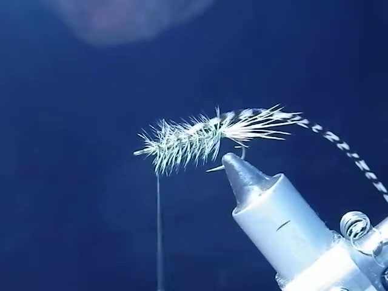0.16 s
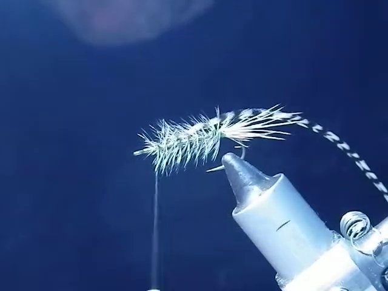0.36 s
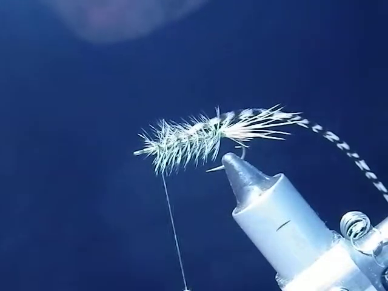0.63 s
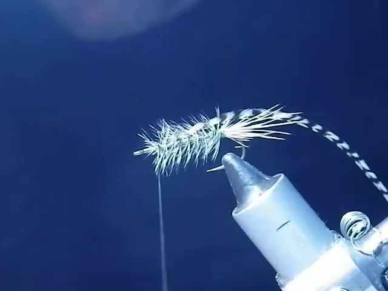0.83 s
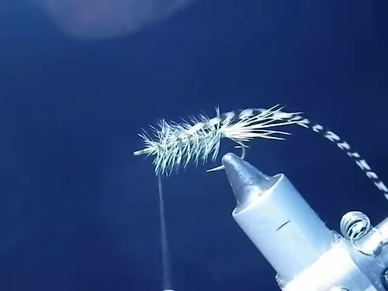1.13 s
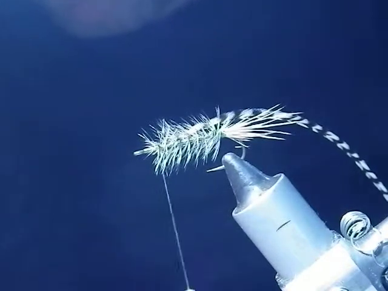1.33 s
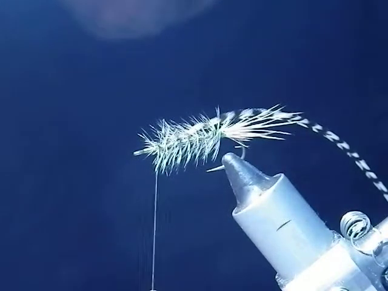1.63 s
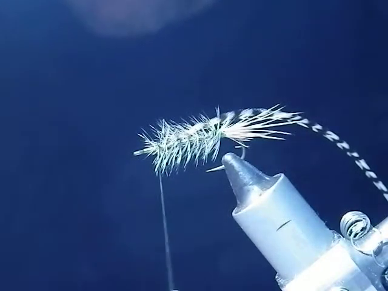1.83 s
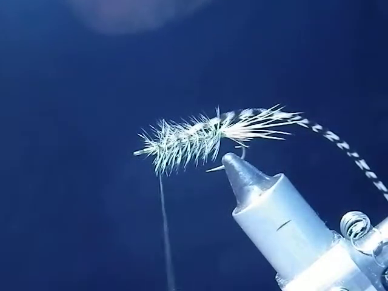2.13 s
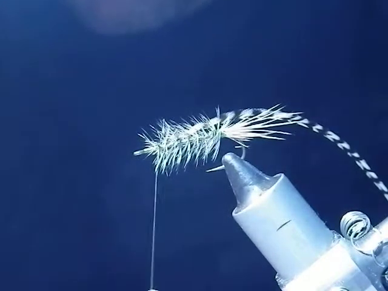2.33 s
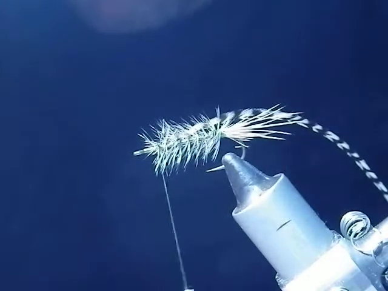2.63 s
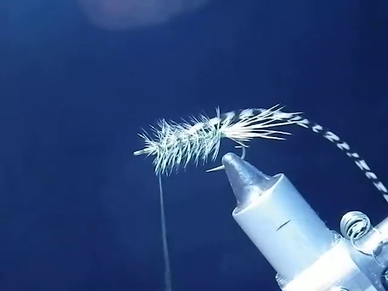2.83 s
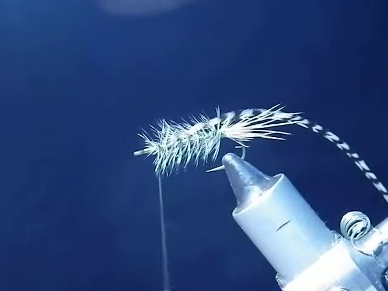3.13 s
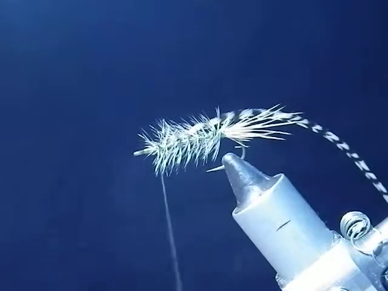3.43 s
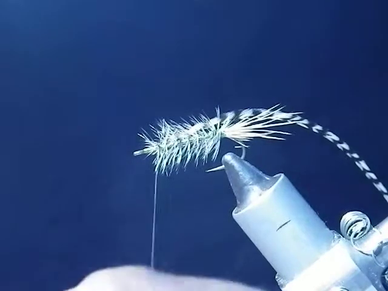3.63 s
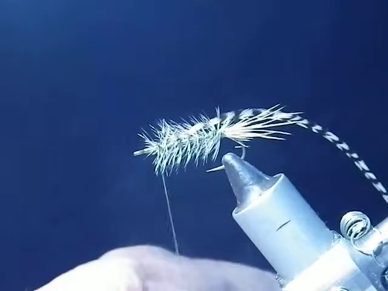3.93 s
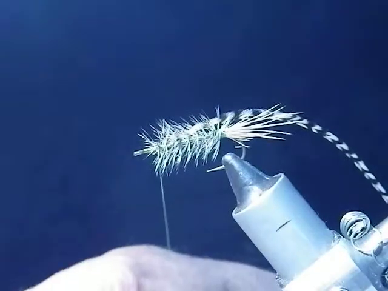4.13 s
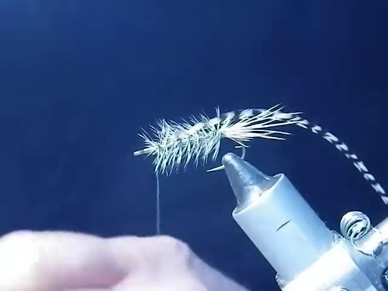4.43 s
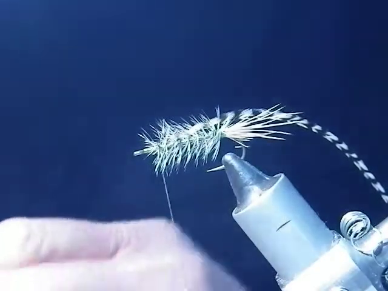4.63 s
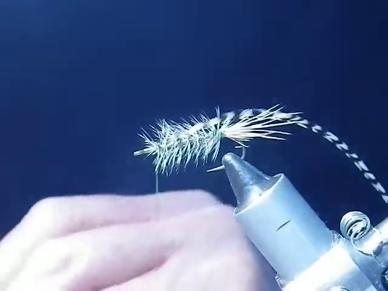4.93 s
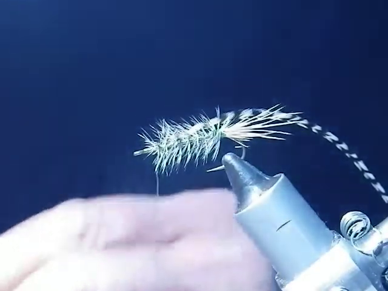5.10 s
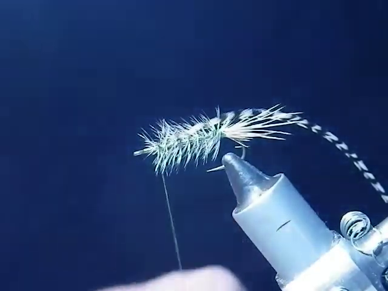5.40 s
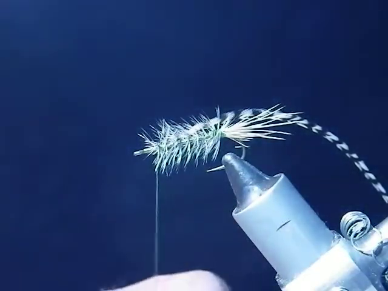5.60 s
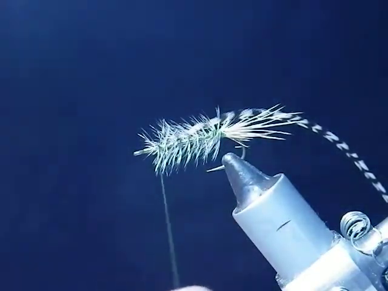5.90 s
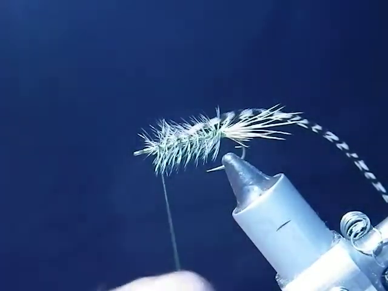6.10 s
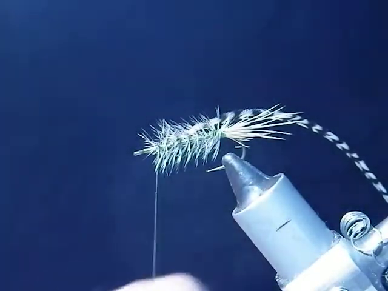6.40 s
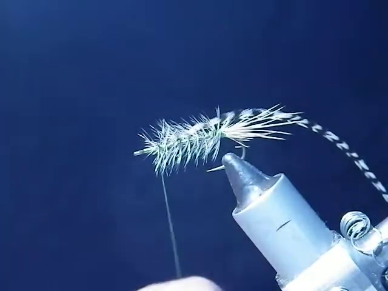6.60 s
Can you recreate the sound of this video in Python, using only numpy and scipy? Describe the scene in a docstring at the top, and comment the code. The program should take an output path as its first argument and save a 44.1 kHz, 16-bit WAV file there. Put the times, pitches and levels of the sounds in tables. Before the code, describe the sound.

A quiet indoor room, close microphone, steady soft hiss with faint low drones. From 0 to 1.2 s fingers, hair and steel rub gently with tiny bright crackles, a light click at 0.23 s and a dull faint bump near 0.75 s. At 1.38 s a small steel tool is tapped once, bright and briefly ringing. Sparse faint touches and a soft bump near 2 s follow. At 2.64 s small metal ticks gather into a sharp, loud click at 2.68 s, another bright one at 2.89 s. From 3.14 to 3.4 s a tool clatters on the desk in rapid uneven bounces, loudest at 3.3 s, with short room reverberation. The hiss is suddenly quieter, then creeps back up. Fine crackles and ticks come around 4.0-4.2 and 4.8-5.0 s. From 5.0 s to the end at about 6.5 s, small scissors make seven soft, crisp two-part snips through hair, about four per second.

```python
"""Scissors and a clatter at a desk

Small steel scissors are handled in a quiet room: metal clicks, skin, hair and steel rub, then a tool clatters
on the desk. Blows are noise cracks with decaying modes; rubs are gritty noise ringing the blades.
The loud clatter makes the gain control duck; as the hiss climbs back the blades snip hair, four times a second.
"""
import sys
import numpy as np
from scipy import signal
from scipy.fft import rfft, irfft
from scipy.io import wavfile
from scipy.ndimage import uniform_filter1d

SR = 44100
rng = np.random.default_rng(int(sys.argv[2]) if len(sys.argv) > 2 else 0)


def to_linear_factor(level_db):
    """Convert decibel levels (scalar or array-like) to linear amplitude factors."""
    exponent = np.asarray(level_db, float) / 20
    return 10 ** exponent


def digitize_waveform(pressure):
    """Quantize a signal to 16-bit integers and store it at the path in sys.argv[1].

    Rows of a 2-D input are taken as channels; values are limited to [-1, 1].
    """
    field = np.atleast_2d(pressure).T
    bounded = np.clip(field, -1, 1)
    quanta = np.round(bounded * 32767).astype(np.int16)
    wavfile.write(sys.argv[1], SR, quanta)


N = 297675


def evened(x):
    """Normalisation: scales a signal to rms 1."""
    return x / np.sqrt(np.mean(x ** 2) + 1e-20)


def read(points, hz):
    """Interpolation along log frequency, linear in the tabled value."""
    f, value = np.transpose(points)
    return np.interp(np.log(hz + 1), np.log(f + 1), value)


def add(mix, s, sound):
    """Superposition: adds a sound to the mix from s seconds on."""
    part = mix[round(s * SR):][:len(sound)]
    part += sound[:len(part)]


def resonate(x, hz, width):
    """Resonance by heterodyning: shift hz down to zero, low-pass, shift back; the peak gain is 1."""
    turn = np.exp(2j * np.pi * hz * np.arange(len(x)) / SR)
    r = np.exp(-np.pi * width / SR)
    return 2 * (turn * signal.lfilter([1 - r], [1, -r], x / turn)).real


def coloured(noise, bass_db, treble_db, deep_db, knee_hz):
    """Spectral shaping: tilts noise in bass and treble about 4.5-6.9 kHz, then scales it to rms 1."""
    shape = [(40, bass_db + deep_db - 31), (250, bass_db + deep_db), (1200, bass_db), (4500, 0), (6900, 0),
             (knee_hz, treble_db), (12000, treble_db - 2.5), (16000, treble_db - 11)]
    filter_gain = to_linear_factor(read(shape, np.fft.rfftfreq(len(noise), 1 / SR)))
    return evened(irfft(rfft(noise) * filter_gain, len(noise)))


def knocks(blows, modes, deep_db, knee_hz, scatter_db, split_hz, snap_db):
    """Modal impact: each blow is a fast-dying noise crack plus modes split into close, beating clusters."""
    out, t = np.zeros(N), np.arange(8192) / SR
    hz, mode_db, mode_t60 = np.transpose(modes)[:, :, None]
    for s, db, bass_db, treble_db, t60, ring_db in blows:
        decay = to_linear_factor(-60 * t / t60) + to_linear_factor(snap_db - 60 * t / .004)  # body and a 4 ms snap
        crack = coloured(rng.standard_normal(len(t)), bass_db, treble_db, deep_db, knee_hz) * decay
        # chance and the colour of the blow decide how strongly each mode is struck
        hit = rng.standard_normal((len(modes), 1))
        struck_db = mode_db + scatter_db * hit + read([(1200, bass_db), (4500, 0), (10500, treble_db)], hz)
        cluster = 0
        for _ in range(4):
            detune, phase = rng.standard_normal((2, len(modes), 1))
            cluster = cluster + np.sin(2 * np.pi * ((hz + split_hz * detune) * t + phase)) / 2
        # each mode starts strong, drops fast, then dies slowly
        fade = to_linear_factor(-60 * t / mode_t60) + 3.5 * to_linear_factor(-60 * t / (0.22 * mode_t60))
        ring = (to_linear_factor(struck_db) * fade * cluster).sum(0) / np.linalg.norm(to_linear_factor(struck_db))
        onset = np.minimum(t / .0003, 1)
        add(out, s, to_linear_factor(db) * (crack + to_linear_factor(ring_db) * ring) * onset)
    return out


def scrapes(strokes):
    """Friction excitation: gritty noise swells to the peak of each stroke and rings the blades."""
    # blade resonances: (frequency [Hz], width [Hz], level before the contact shift [dB])
    blades = [(2461, 250, -9), (4860, 450, -3.5), (6400, 260, -1.5), (8645, 350, -5), (9500, 200, -4.5),
              (10764, 350, -3), (12355, 250, -6.5)]
    out, t = np.zeros(N), np.arange(-4096, 8192) / SR
    for s, db, bass_db, treble_db, rise, fall in strokes:
        swell = np.exp(-abs(np.where(t < 0, t / rise, t / fall)) ** 1.25)
        grit_db = 2.8 * evened(uniform_filter1d(rng.standard_normal(len(t)), size=40))
        noise = coloured(rng.standard_normal(len(t)), bass_db, treble_db, deep_db=-11, knee_hz=9500)
        rub = noise * swell * to_linear_factor(grit_db)
        # the contact point favours other modes each time; slow rubs ring the blades less
        contact_db = 7 - 90 * rise + 4.5 * rng.standard_normal(len(blades))
        rub += sum(to_linear_factor(peak_db + shift_db) * resonate(rub, hz, width)
                   for (hz, width, peak_db), shift_db in zip(blades, contact_db))
        add(out, s + t[0], to_linear_factor(db) * rub)
    return out


def hiss():
    """Stationary random noise: room air and microphone hiss with faint patches, and two wavering drones."""
    # hiss spectrum: (frequency [Hz], relative density [dB])
    spectrum = [(12, -38.5), (24, -14), (44, -3), (91, -6), (169, -5), (297, -10.5), (416, -12),
                (521, -15.5), (2010, -22.5), (2970, -24.5), (6170, -26), (7730, -26.5), (13600, -27.5),
                (15200, -30.5), (16500, -53)]
    # low drones, narrow-band noise: (frequency [Hz], width of each of two resonances [Hz], rms level [dB])
    drones = [(45.7, 9, -63.5), (173, 4, -62)]
    frames, hz = N // 512 + 5, np.fft.rfftfreq(2048, 1 / SR)
    a, b, patches = rng.standard_normal((frames, 1025, 3)).T
    patches = uniform_filter1d(uniform_filter1d(patches, size=30, axis=0), size=8, axis=1)
    z = (a + 1j * b) * to_linear_factor(read(spectrum, hz)[:, None] + 0.69 * evened(patches))
    air = to_linear_factor(-51) * evened(signal.istft(z, nperseg=2048, noverlap=1536)[1][:N])
    stir = rng.standard_normal(N)
    for f, width, db in drones:
        air += to_linear_factor(db) * evened(resonate(resonate(stir, f, width), f, width))
    return air


def crackle():
    """Poisson impulses: tiny bright ticks of hair and fingers, each ringing two broad resonances."""
    # pace of the fidgeting hands: (time [s], mean rate [ticks/s])
    pace = [(0, 90), (.6, 50), (.72, 110), (1.1, 60), (1.2, 5), (3.85, 5), (4.0, 200), (4.2, 200),
            (4.27, 20), (4.7, 30), (4.78, 150), (5.0, 120), (5.05, 0)]
    s, per_s = np.transpose(pace)
    struck = rng.random(N) < np.interp(np.arange(N) / SR, s, per_s) / SR
    size_db = 3.9 * np.minimum(rng.exponential(1, N), 2.4)
    ticks = struck * to_linear_factor(size_db) * rng.standard_normal(N)
    return to_linear_factor(-33) * (resonate(ticks, 9500, 1600) + .7 * resonate(ticks, 6400, 800))


def rubs():
    """Sliding friction: fingers, hair and steel rub slowly, each stroke rising and falling alike."""
    # (time of peak [s], level [dB], bass [dB], treble [dB], rise and fall [s])
    slow_rubs = [(.105, -53, 8, 2.5, .058), (.24, -57, 3, -6, .065), (.34, -52, 8, -2, .052),
                 (.43, -56, 6, -8, .04), (.515, -55, 2, -.5, .056), (1.265, -50, -1, -7, .032),
                 (1.323, -46, 3.5, -4, .044), (1.755, -56, -7, -3.5, .029), (2.275, -62.5, 0, -7, .058),
                 (2.655, -44, -6, 0, .022), (2.674, -33, -2, -2, .008), (2.692, -40, -4, 2, .016),
                 (2.86, -49.5, 1, 0, .07), (3.032, -48.5, -.5, -1.5, .045), (4.966, -49, -15, 8, .013),
                 (4.997, -46.5, -19.5, 5, .021), (5.141, -50.5, -20, 7, .011)]
    return scrapes([(*row, row[-1]) for row in slow_rubs])


def clicks():
    """Contact stiffness: a dull touch of metal or fingers lasts longer; a bright, hard one rings the steel more."""
    # touches: (time [s], level [dB], bass [dB], treble [dB])
    touches = [(.163, -43, 0, -5), (.233, -32, -9, -9), (.248, -47, 7.5, -8), (.741, -44, -18, 5),
               (1.332, -49, 3, -5), (1.36, -46, -3, -13.5), (1.835, -43, 6, -1), (1.954, -50, 0, -4),
               (2.635, -45, -6, -1), (2.641, -39.5, -6, -1), (2.648, -38.5, -11, 1.5),
               (2.657, -37.5, -6, -2), (2.665, -38, 0, -5), (2.6765, -8, -9, 5), (2.824, -39, 1, -7.5),
               (2.8915, -27.5, -10, 12), (2.922, -41.5, 6, -4), (2.986, -42, 4, -.5),
               (3.031, -39.5, -26, 4.5), (3.051, -43, 12, .6), (3.073, -43, -3, -5), (3.751, -44, -12, 1.5),
               (4.013, -44, -15, 0), (4.043, -45.5, -15, 9), (4.109, -41.5, -25, 13), (4.134, -41, -22, 13),
               (4.171, -44, -20, 5), (4.198, -43, -21.5, 1), (4.769, -47, -20, 3), (4.782, -47, -22, 7.5),
               (4.845, -42.5, -21, 6)]
    # modes of the scissor steel: (frequency [Hz], level [dB], t60 of the slow part [s])
    steel = [(2502.6, -9.5, 0.055), (3950, -.6, .19), (6880, -4, .14), (8818, -11.5, .1), (9790, -5, .085),
             (10220, -6.5, .14), (11040, -6.5, .07), (11580, -6, .17), (12843, -10.5, 0.069),
             (14298, -11, .08)]
    blows = []
    for s, db, bass_db, treble_db in touches:
        t60 = .034 * to_linear_factor(.3 * bass_db)  # seconds
        ring_db = -17 + .4 * treble_db + .25 * db
        blows.append((s, db, bass_db, treble_db, t60, ring_db))
    return knocks(blows, steel, deep_db=-9.5, knee_hz=9500, scatter_db=2.5, split_hz=90, snap_db=1)


def thumps():
    """Damped low-frequency oscillation: dull bumps through the desk, a few cycles that swell and die."""
    # (time of peak [s], level [dB], frequency [Hz], rise to the peak [s], fall [s]), both times to 1/e
    bumps = [(.75, -46, 49.7, 0.017, 0.065), (2.04, -42, 48, 0.021, 0.039),
             (2.677, -36.5, 163, 0.0014, 0.0065), (3.04, -42.5, 100, 0.026, 0.086),
             (3.145, -32.5, 110, 0.0036, .04)]
    out, t = np.zeros(N), np.arange(-4096, 8192) / SR
    for s, db, hz, rise, fall in bumps:
        swell = np.exp(-np.where(t < 0, (t / rise) ** 2, t / fall))
        add(out, s + t[0], to_linear_factor(db) * swell * np.sin(2 * np.pi * hz * t))
    return out


def tap():
    """Modal impact on a small body: a smaller steel tool is tapped once."""
    # (time [s], level [dB], bass [dB], treble [dB], t60 of the crack [s], ring over crack [dB])
    single_tap = [(1.376, -16, -23, 10.5, .035, -4.5)]
    # modes of the tool: (frequency [Hz], level [dB], t60 of the slow part [s])
    tool = [(4870, -4, .11), (6870, -4.5, .085), (8053, -15, .04), (9620, -2.5, .105), (10600, -1.5, .04),
            (11600, -6, .075), (13890, -13, .05), (15600, -8, 0.032)]
    return knocks(single_tap, tool, deep_db=-15.5, knee_hz=9500, scatter_db=0.3, split_hz=74, snap_db=4)


def clatter():
    """Repeated impact: the dropped tool bounces on the desk; short contacts ring less."""
    # bounces: (time [s], level [dB], bass [dB], treble [dB], t60 of the crack [s])
    bounces = [(3.138, -12, -4, -18.5, .08), (3.143, -11.5, -2.5, -11.5, .081), (3.151, -8, -1, -13, .044),
               (3.1695, -4.5, -4.5, -12.5, .059), (3.187, -20.5, -1.5, -13, .04),
               (3.2055, -6.5, -2, -11.5, .04), (3.2185, -9.5, -4, -21, .032), (3.225, -16, 0, -31.5, .041),
               (3.263, -33, 13.5, -25.5, .54), (3.277, -31, 12.5, -29.5, .39), (3.3035, 8, -6.5, -2.5, .02),
               (3.351, 0, -6, -9, .025), (3.379, -7, -4, -7, .02), (3.393, -14, -3, -10.5, .03)]
    # modes of tool and desk top: (frequency [Hz], level [dB], t60 of the slow part [s])
    desk_modes = [(165, -19, .2), (320, -15, .15), (529, -8, .14), (1043.5, -12.5, 0.042),
                  (1335, -2.5, .13), (1619.4, -6.5, .07), (1786, -7, 0.083), (2241, -2.5, .09),
                  (2515, -3.5, .1), (2640, -5, .1), (2943, 3, 0.034), (3350, -3, .12), (3690, -5.5, .1),
                  (4450, -10, 0.048), (4396, -3, .06), (4660, -3.5, .06), (6480, 3, .05), (9460, -9.5, .06)]
    # ring gains 4.8 dB per doubling of t60, reaching 11 dB at 1 s
    blows = [(*row, 11 + 4.8 * np.log2(row[-1])) for row in bounces]
    return knocks(blows, desk_modes, deep_db=-10, knee_hz=8300, scatter_db=3.5, split_hz=35, snap_db=3.5)


def snips():
    """Shearing: in each snip the edges touch, bite into the hair, shear it and shut."""
    # (bite time [s], bite level [dB], shut time [s], shut level [dB], touch ahead of the bite [s])
    closings = [(5.009, -44, 5.022, -33.5, .004), (5.2852, -37, 5.3217, -34, .005),
                (5.529, -40, 5.5488, -31, .007), (5.7559, -38.5, 5.79, -35.5, .006),
                (5.983, -42, 6.0074, -33, .006), (6.2286, -36.5, 6.2408, -32, .003),
                (6.4695, -39, 6.5, -37.5, .003)]
    # colour and shape of the parts: (bass [dB], treble [dB], rise [s], fall [s])
    touch_shape = (-10, -4.5, .0025, .0035)
    bite_shape = (-14, .6, .0024, .0042)
    shut_shape = (-8, 2.2, .0042, .0048)
    strokes = []
    for bite, bite_db, shut, shut_db, lead in closings:
        stroke_s = shut - bite
        span = .35 * stroke_s
        strokes += [(bite - lead, bite_db - 8, *touch_shape),
                    (bite, bite_db, *bite_shape),
                    (bite + .65 * stroke_s, shut_db - 13, -14, 1.5, span, span),  # the shear
                    (shut, shut_db, *shut_shape)]
    return scrapes(strokes)


def room(x):
    """Reverberation: sparse reflections of random sign, each band dying at its own speed."""
    # (frequency [Hz], t60 [s])
    decay_times = [(150, .4), (1000, .4), (4000, .29), (8000, .27), (13000, .19)]
    taps = np.zeros(SR // 2)
    places = np.arange(120, SR // 2 - 20, 20)
    taps[places + rng.integers(0, 20, len(places))] = 1
    hz, t, z = signal.stft(taps * rng.choice([-1., 1.], len(taps)), SR, nperseg=256)
    fade = to_linear_factor(-60 * t / read(decay_times, hz)[:, None])
    tail = signal.istft(z * fade, SR, nperseg=256)[1]
    return signal.fftconvolve(x, tail / np.linalg.norm(tail))[:N]


def scene():
    """Direct and reverberant field: all sources near the microphone, with the room behind them."""
    background = hiss()
    near = crackle() + rubs() + clicks() + tap() + snips()
    desk = clatter()
    reverb = room(to_linear_factor(-16) * near + to_linear_factor(-8.5) * desk)
    return (near + desk + reverb + thumps() + background)[None]


def duck(heard):
    """Automatic gain control: gain sinks while the short-term power is high and creeps back after."""
    memory = 1 - 1 / (.008 * SR)  # 8 ms averaging
    power = signal.lfilter([1 - memory], [1, -memory], heard ** 2)
    power_db = 10 * np.log10(abs(power) + 1e-12)
    loud = 1 / (1 + np.exp(-(power_db + 26.5) / 3.8))  # 0 quiet, 1 loud
    sink_db = np.cumsum(101.4 * loud - 12.5) / SR  # down at up to 88.9 dB/s, back at up to 12.5 dB/s
    return heard / to_linear_factor(sink_db - np.minimum.accumulate(sink_db))  # gain never rises above 1


def band_limit(x):
    """A steep low-pass at the top of the band."""
    return signal.sosfilt(signal.butter(12, 16850, fs=SR, output="sos"), x)


def record(dry):
    """Microphone chain: a notch from the housing, gain control, saturation of peaks and a low-pass."""
    heard = dry[0] - 0.31 * resonate(dry[0], 7850, 330)
    ducked = duck(heard)
    clipped = 0.73 * np.tanh((abs(ducked) / 0.73) ** 2) ** .5 * np.sign(ducked)
    low_pass = signal.firwin(255, 15900, fs=SR)
    mix = signal.oaconvolve(clipped, low_pass, "same")[None]
    return band_limit(mix)


dry = scene()
out = record(dry)
digitize_waveform(out)
```